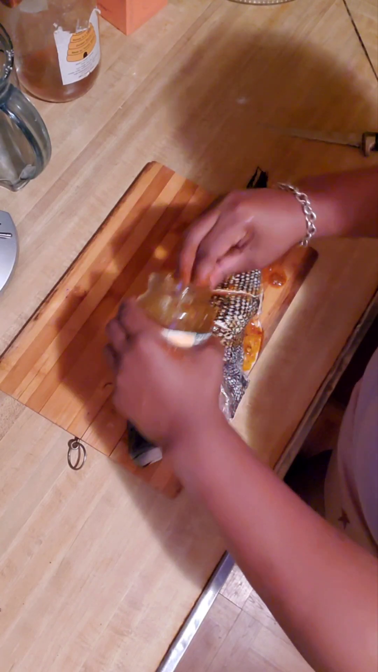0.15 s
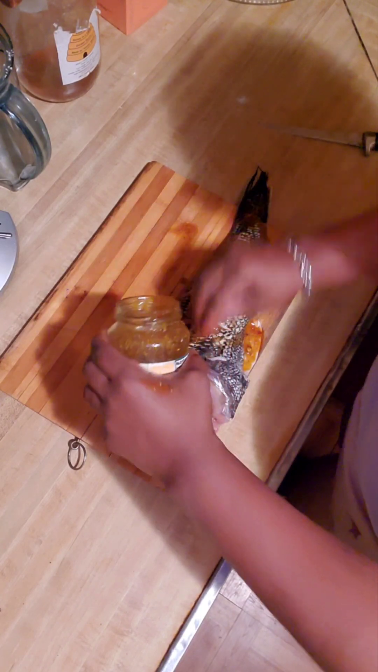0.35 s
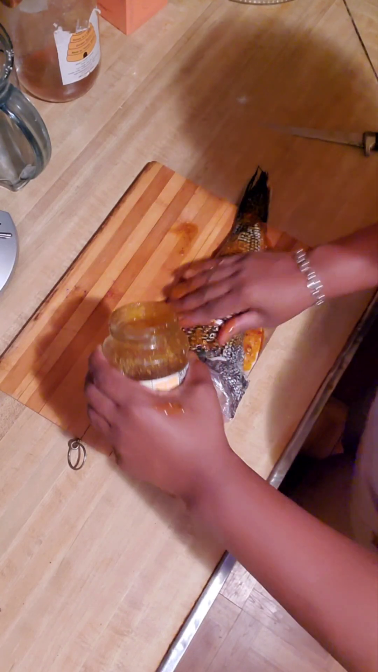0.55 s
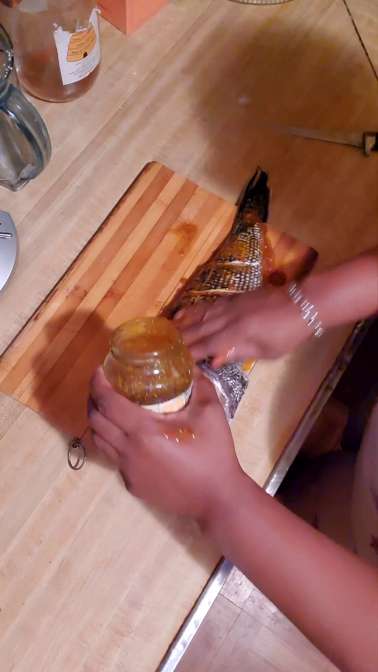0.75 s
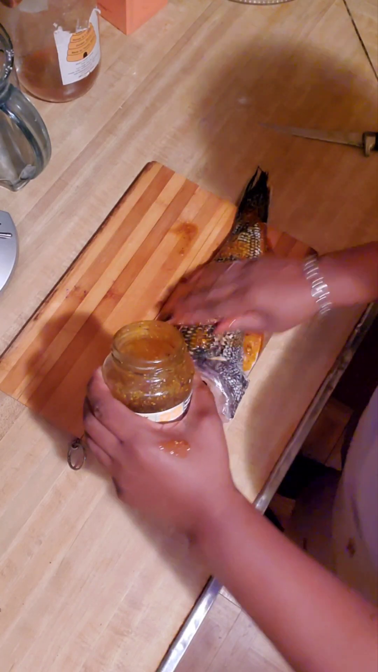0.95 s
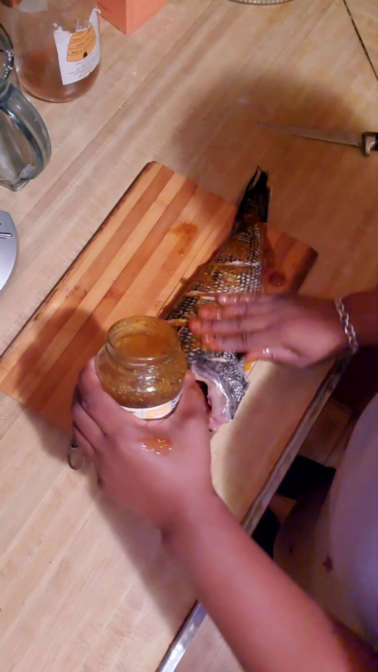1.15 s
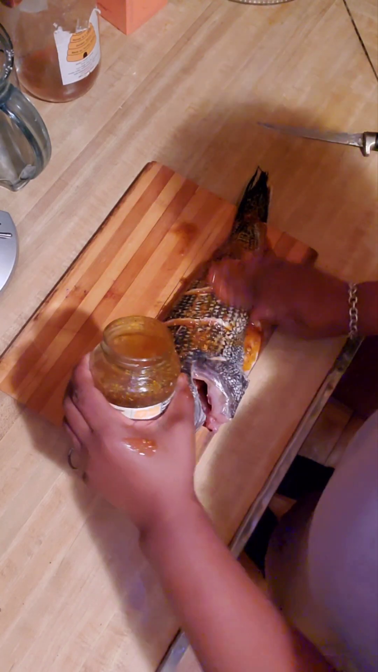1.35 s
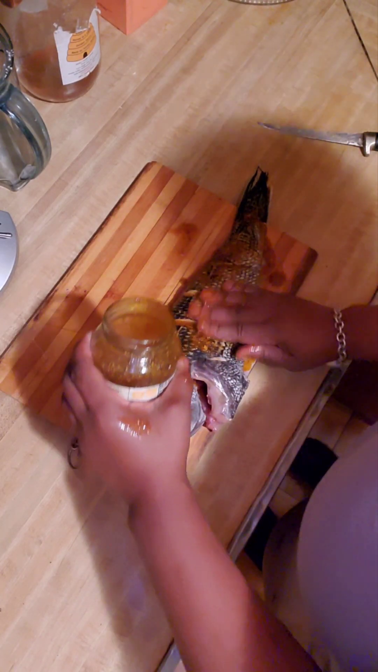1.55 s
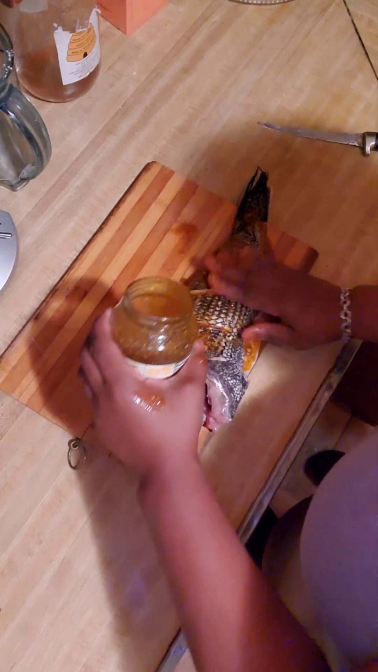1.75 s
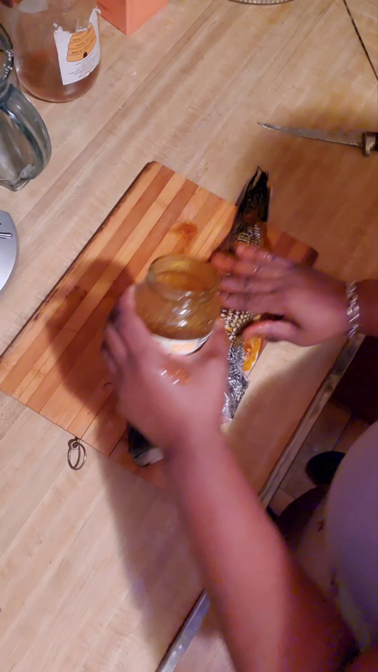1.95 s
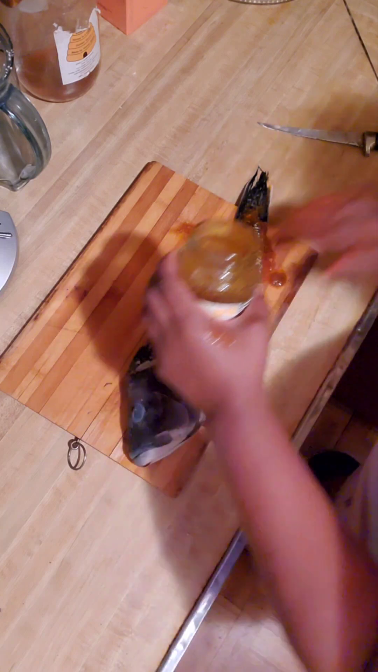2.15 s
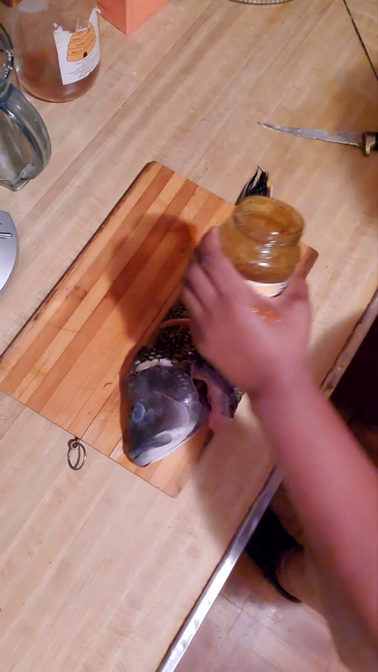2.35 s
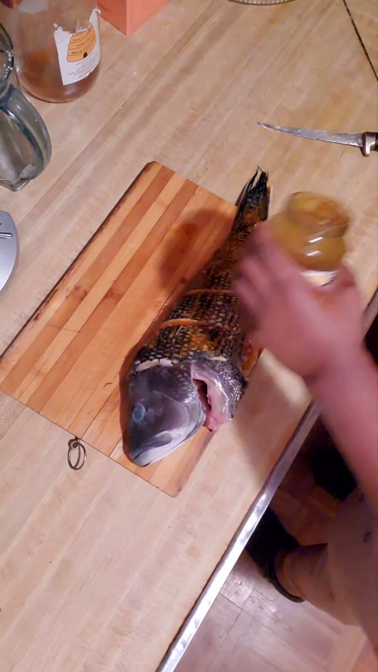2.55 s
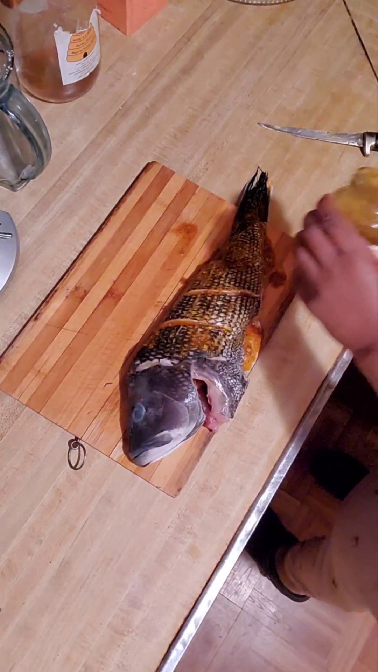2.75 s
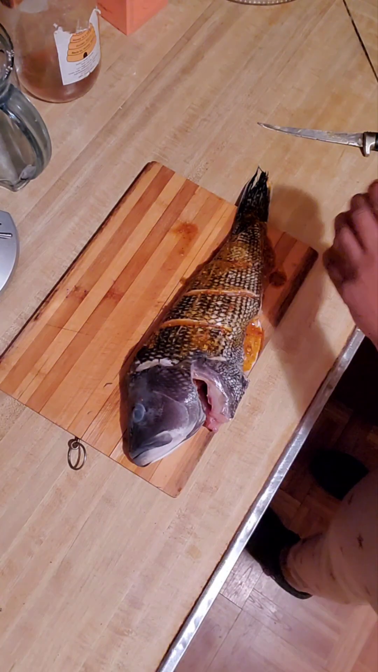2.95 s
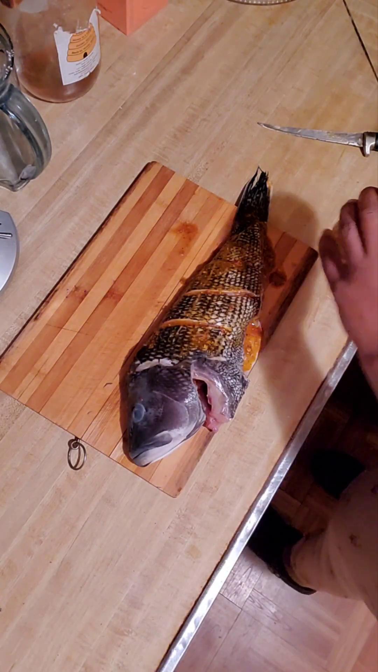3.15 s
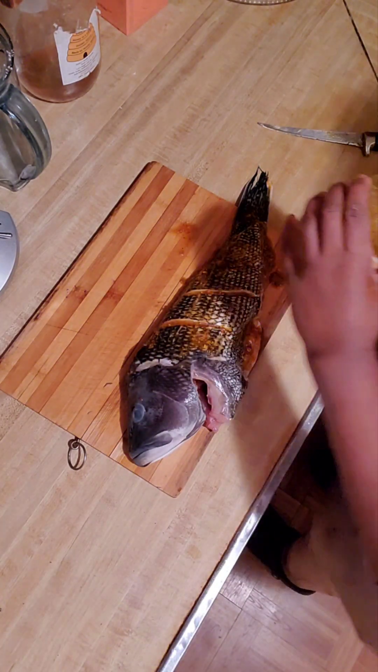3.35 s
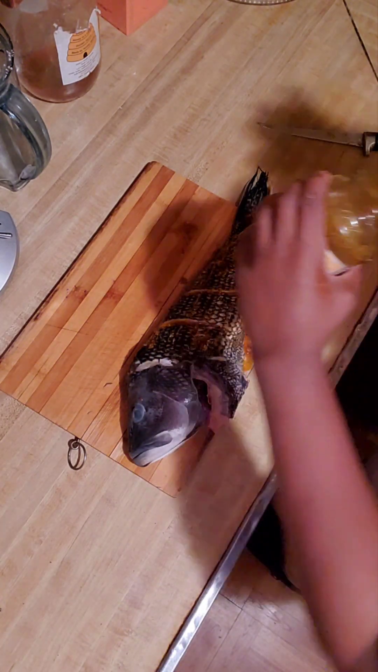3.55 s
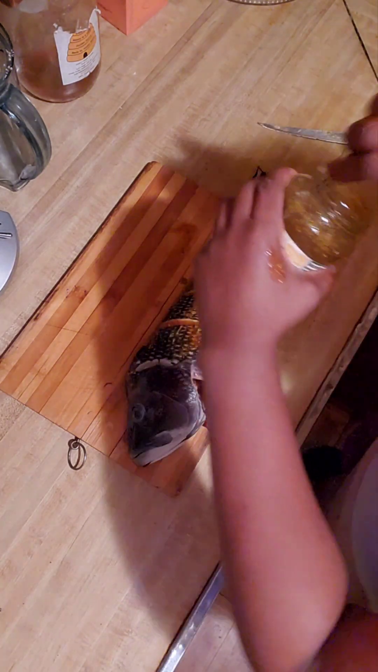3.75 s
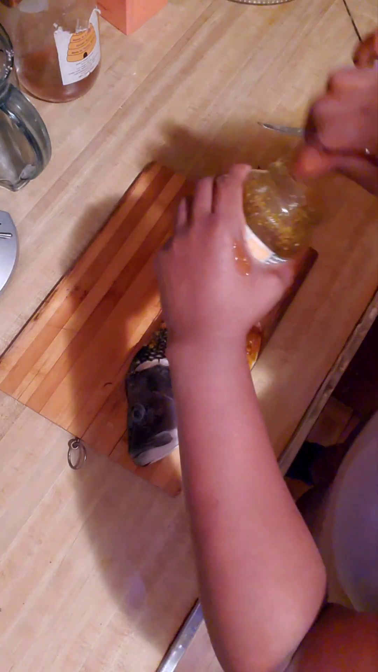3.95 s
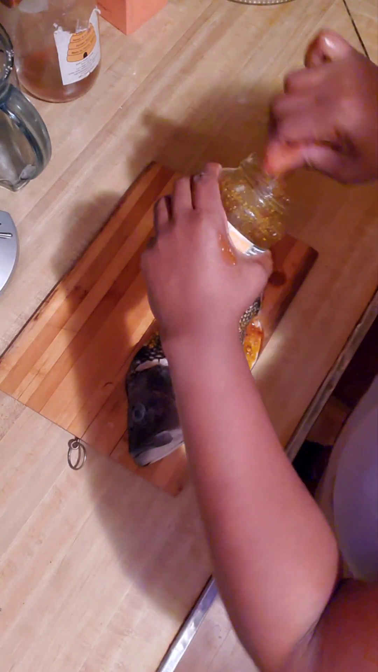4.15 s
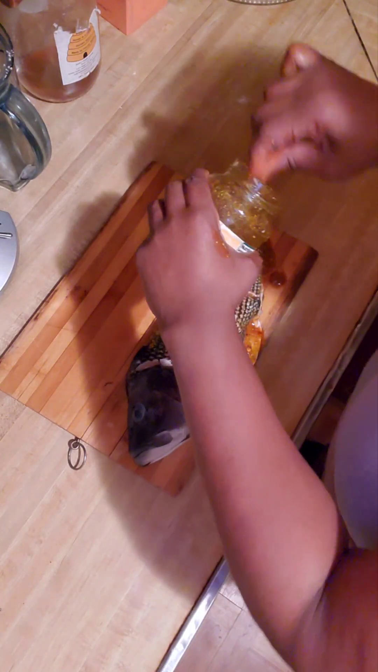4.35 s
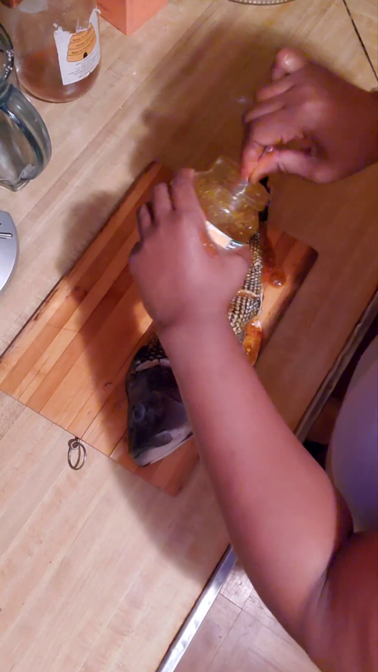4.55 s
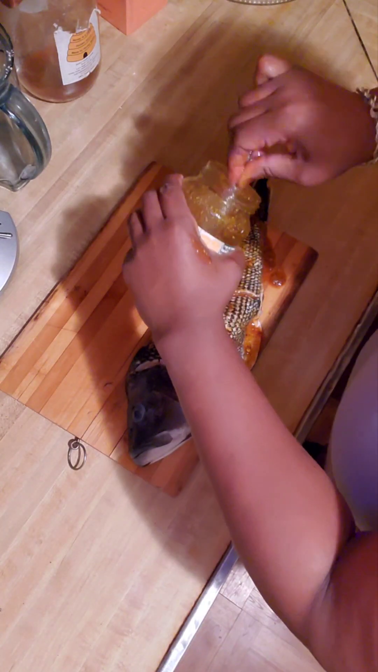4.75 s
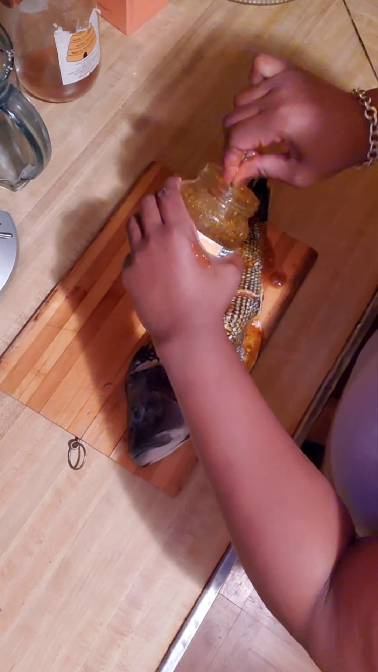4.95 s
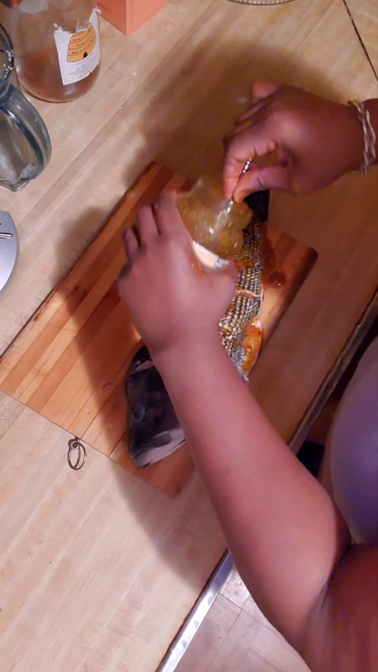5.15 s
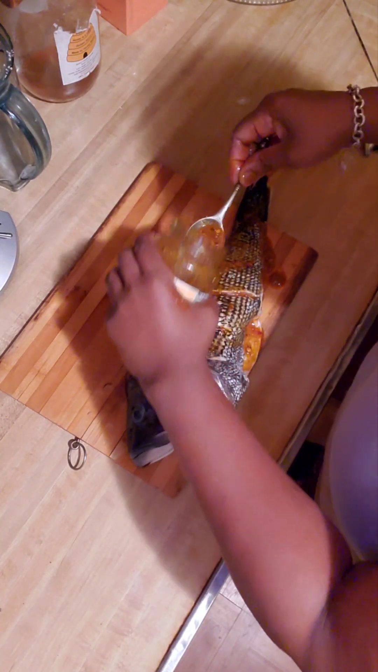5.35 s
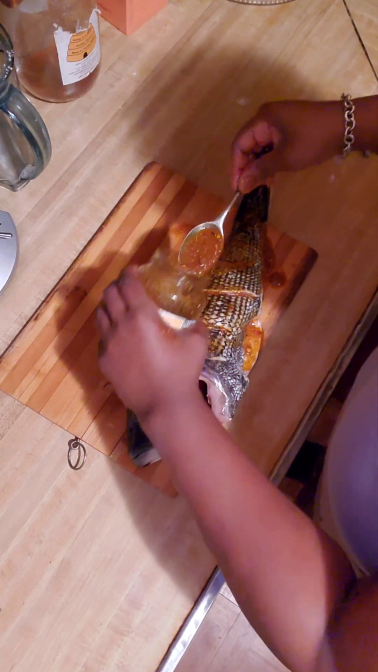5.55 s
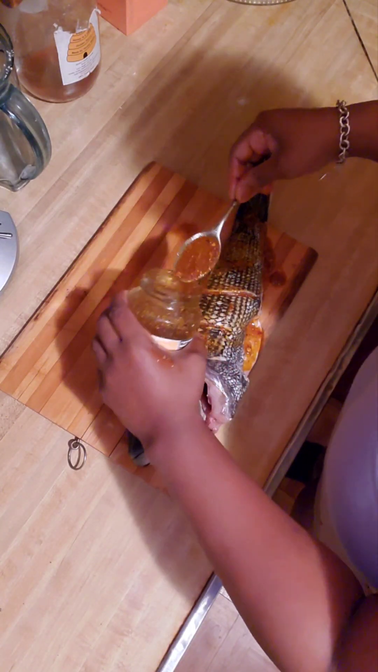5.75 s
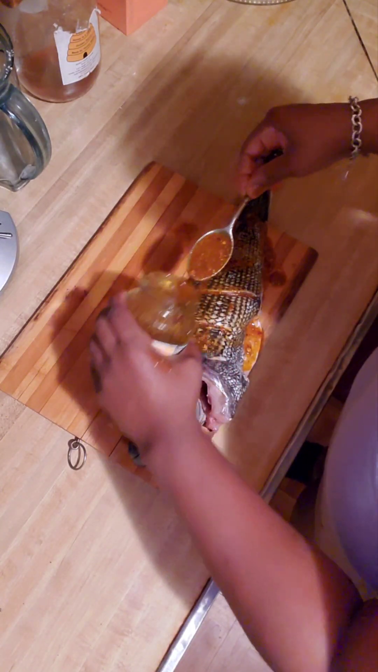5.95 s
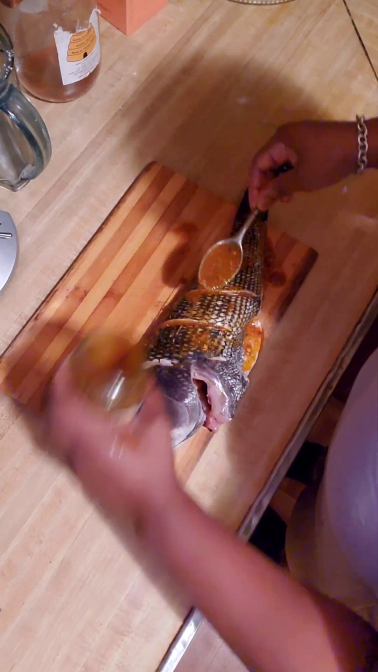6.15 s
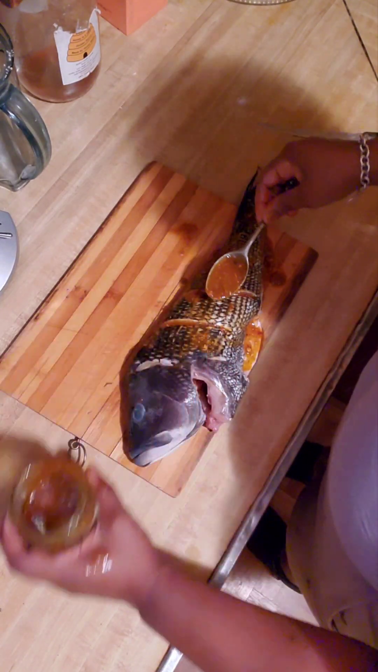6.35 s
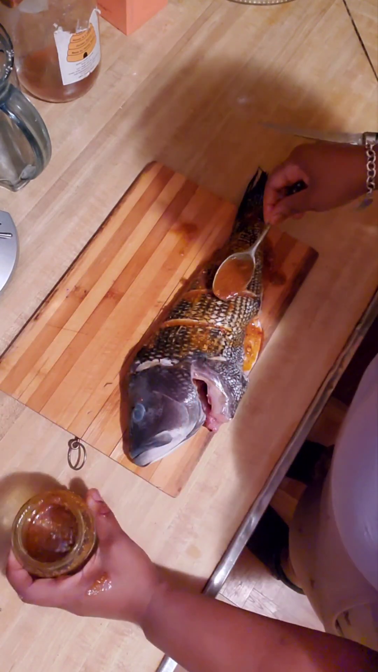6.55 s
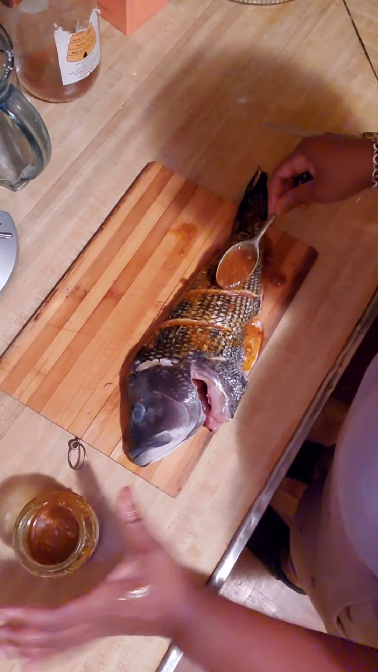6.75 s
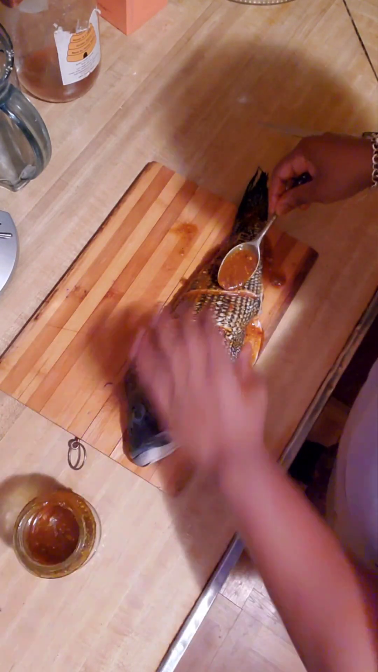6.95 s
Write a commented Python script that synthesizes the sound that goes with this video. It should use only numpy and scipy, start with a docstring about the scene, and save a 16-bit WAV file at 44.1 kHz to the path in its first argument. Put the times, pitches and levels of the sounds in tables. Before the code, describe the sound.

Throughout, a kitchen extractor fan gives a low airy rush with wavering motor hum and boxy resonances. From 0 to 1 s, a hand makes very faint wet pats on a fish; from about 1.0 to 2.1 s these become crisp, sticky smacks with a light slap near 1.4 s and a whispery palm slide, strongest around 1.95 s. Quiet then, apart from a soft smack at 2.9 s and faint cutlery touches. At 3.65 s a spoon clinks brightly into a hand-held glass jar, with a thin metallic ring and hollow boom at 3.84 s. Irregular, sauce-damped clinks and short scrapes continue to 5.35 s, then a lighter draw over the rim until about 5.7 s. Tiny metal ticks follow. At 6.6 s the jar knocks heavily onto the wooden counter, rocks with two weaker taps and settles by 6.75 s, leaving the fan. Close phone microphone, short room echo.

```python
"""Throughout, an extractor fan in a small kitchen makes air rush, wavering hum and housing resonances.
First a hand pats sauce on a fish: band-passed noise bursts for smacks and slaps, random grains for the slide.
Then a spoon clinks and scrapes in a hand-held glass jar: bursts and dense clicks ring the glass, air booms.
Thin metal rings and ticks are scattered around; last, the jar knocks down on a wooden counter.
A phone microphone with two ports adds colour, hiss, gain control and rounded peaks."""
import sys
import numpy as np
from scipy import signal
from scipy.fft import rfft, irfft, next_fast_len
from scipy.io import wavfile
from scipy.ndimage import uniform_filter1d

SR = 44100
rng = np.random.default_rng(int(sys.argv[2]) if len(sys.argv) > 2 else 0)


def generate_wav(signal):
    """Clip the signal to [-1, 1] and save it as 16-bit WAV at the path in sys.argv[1]."""
    frames = np.transpose(np.atleast_2d(signal))
    scaled = np.clip(frames, -1, 1) * 32767
    pcm = np.round(scaled).astype(np.int16)
    wavfile.write(sys.argv[1], SR, pcm)


N = 312669   # samples in the scene
BURST_N = 12000   # samples in one burst


def amp(db):
    """Decibels to gain."""
    return 10 ** (np.asarray(db, float) / 20)


def rms_one(x):
    """Scale to unit rms."""
    return x / np.sqrt(np.mean(x ** 2) + 1e-30)


def at_peak(db, x):
    """Scale to a peak level in dB."""
    return amp(db) * x / np.abs(x).max()


def level(rows):
    """Gain along a (t/s, level/dB) curve, held at -120 dB outside it."""
    s, db = np.transpose(rows)
    return amp(np.interp(np.arange(N) / SR, s, db, left=-120, right=-120))


def wander(points):
    """A random curve, joined by straight lines between evenly spaced points."""
    return np.interp(np.arange(N), np.linspace(0, N, points), rng.standard_normal(points))


def at_hz(points, hz):
    """Read a table on a log-frequency axis."""
    points = np.array(points)
    return np.interp(np.log(hz + 1), np.log(points[:, 0]), points[:, 1])


def coloured(x, spectrum):
    """Give a steady or dense signal a spectrum."""
    size = next_fast_len(N)
    gain = amp(at_hz(spectrum, np.fft.rfftfreq(size, 1 / SR)))
    return irfft(rfft(x, size) * gain)[:N]


def band_pass(x, edges):
    """Keep the band between two edges in Hz."""
    return signal.sosfilt(signal.butter(2, edges, "band", fs=SR, output="sos"), x)


def around(x, modes):
    """Keep only the band that a family of modes spans."""
    hz = [mode[0] for mode in modes]
    return band_pass(x, [0.89 * min(hz), 0.985 * max(hz)])


def clicks(times, sizes):
    """Single-sample impulses."""
    out = np.full(N, 1e-18)
    np.add.at(out, (np.asarray(times) * SR).astype(int), sizes)
    return out


def grains(per_s, spread_db):
    """Random clicks of uneven size and either sign."""
    sizes = amp(spread_db * np.minimum(rng.exponential(1, N), 5)) * rng.choice([-1, 1], N)
    return rms_one(sizes * (rng.random(N) < per_s / SR)) + 1e-12


def burst(rise, length):
    """Noise that swells over its rise, then dies at 60 dB per length (both s), cut at BURST_N."""
    t = np.arange(BURST_N) / SR
    rise = max(rise, 1e-4)
    swell = np.minimum(t / rise, 1)
    decay = amp(-60 * np.maximum(t - rise, 0) / max(length, 1e-4))
    return rng.standard_normal(BURST_N) * swell * decay


def ring(force, hz, t60):
    """A unit click sets a decaying sine of about unit height ringing."""
    r = amp(-60 / (max(t60, .002) * SR))
    w = 2 * np.pi * hz / SR
    return signal.lfilter([0, np.sin(w)], [1, -2 * r * np.cos(w), r * r], force)


def struck(blows, modes):
    """Clean clicks into a table of modes."""
    s, db = np.transpose(blows)
    force = clicks(s, amp(db))
    return sum(amp(mode_db) * ring(force, hz, t60) for hz, mode_db, t60 in modes)


def add(out, s, sound):
    """Mix a sound in at a time."""
    start = int(s * SR)
    out[..., start:start + sound.shape[-1]] += sound[..., :N - start]


# colour of the air rush: [f/Hz, relative level/dB]
AIR_COLOUR = [(13, -60.5), (22, -40.5), (55, 1.5), (76, -1), (94, -14.5), (124, -9.5), (265, -10.5),
              (308, -7), (597, -30), (731, -14), (943, -22.5), (1180, -21), (2070, -44.5), (7560, -42.5),
              (9500, -58), (12400, -95), (20900, -120)]
# resonances of the fan housing: [f/Hz, nominal width/Hz, rms level/dB]
HOUSING_MODES = [(69, 19, -53), (162.3, 16, -60.5), (234.7, 16, -55), (358.2, 45, -56.5),
                 (650.6, 25.6, -53.5), (729, 47, -55.5), (1173, 110, -66.5), (1546, 20, -72.5),
                 (1925, 22, -82), (3670, 330, -83), (4830, 37, -82)]
AIR_DB, HUM_HZ, HUM_DB = -50.5, 64, -51   # rms levels


def fan():
    """Air rush, motor hum that wavers in pitch, and noise ringing in the housing."""
    out = amp(AIR_DB) * rms_one(coloured(rng.standard_normal(N), AIR_COLOUR))
    hum_hz = HUM_HZ * (1 + 0.039 * wander(points=40))
    out += amp(HUM_DB) * np.sqrt(2) * np.sin(np.cumsum(2 * np.pi * hum_hz / SR))
    for hz, width, db in HOUSING_MODES:
        out += amp(db) * rms_one(ring(rng.standard_normal(N), hz, 2.83 / width))
    return out


# reverberation of the kitchen: [f/Hz, t60/s]
ROOM_DECAY = [(100, 0.13), (500, 0.28), (2000, 0.21), (6000, 0.26), (15000, 0.16)]


def tail(count):
    """Diffuse echoes: noise whose octave bands die at their own rates."""
    t, out = np.arange(count) / SR, 0
    for hz in 90 * 2 ** np.arange(8):
        band = band_pass(rng.standard_normal(count), [hz / np.sqrt(2), hz * np.sqrt(2)])
        out = out + band * amp(-60 * t / at_hz(ROOM_DECAY, hz))
    return out * np.clip(t / 0.0043, 0, 1) / np.sqrt(np.sum(out ** 2))


# cutlery touches cutlery: [t/s, click level/dB]
CUTLERY_TOUCHES = [(1.775, -66), (1.81, -55), (1.93, -80), (3.311, -55), (3.34, -53.5), (3.435, -66),
                   (3.816, -36)]
# cutlery modes: [f/Hz, relative level/dB, t60/s]
CUTLERY_MODES = [(7910, 0, 0.36), (14370, 4.5, .12)]
# the loosely held spoon rings on at the rim: [t/s, click level/dB]
RIM_TOUCHES = [(3.648, -36.5)]
# spoon modes: [f/Hz, relative level/dB, t60/s]
SPOON_MODES = [(8950, 2, 0.32), (10680, -3.5, 0.249), (15600, -10, 0.086)]
# faint small metal ticks: [t/s, peak level/dB, f/Hz]
METAL_TICKS = [(5.8721, -50, 7000), (6.0811, -56.5, 7270), (6.5344, -65.5, 6750), (6.7406, -49, 5860),
               (6.754, -46, 5690)]


def metal():
    """Clicks ring thin high modes of cutlery and spoon; noise bursts make short rough ticks."""
    out = struck(CUTLERY_TOUCHES, CUTLERY_MODES) + struck(RIM_TOUCHES, SPOON_MODES)
    for s, db, hz in METAL_TICKS:
        add(out, s, at_peak(db, ring(burst(0.0018, 0.079), hz, t60=0.021)))
    return out


# palm sliding: [t/s, rms level/dB]
SLIDE_LEVEL = [(0.0, -100), (0.56, -77), (1.04, -65), (1.19, -74), (1.42, -78), (1.46, -51), (1.59, -59.5),
               (2.11, -69), (2.64, -77), (3.31, -82), (3.6, -71)]
# colour of the slide: [f/Hz, relative level/dB]
SLIDE_COLOUR = [(1180, -42), (2000, -12.5), (3310, -3), (4570, -24), (6200, -1.5), (8260, -1),
                (9410, -18.5), (14000, -12.5), (16000, -15)]


def slide():
    """The palm slides as a dense stream of coloured grains."""
    return level(SLIDE_LEVEL) * rms_one(coloured(grains(3800, spread_db=4.5), SLIDE_COLOUR))


FAINT_SPAN_S, FAINT_DB, FAINT_SPREAD_DB = (.02, 2.9), -62, 4
FAINT_HZ, FAINT_OCTAVES, FAINT_S = (3500, 6900), .4, .05


def faint_pats(count):
    """Faint smacks by chance while the hand works, as rows like those of SMACKS."""
    rows = []
    for when, size, pitch in rng.random((count, 3)):
        s = np.interp(when, [0, 1], FAINT_SPAN_S)
        db = FAINT_DB + FAINT_SPREAD_DB * (2 * size - 1)
        rows.append((s, db, FAINT_HZ[int(pitch > .5)], FAINT_OCTAVES, FAINT_S))
    return rows


# palm on wet scales: [t/s, peak level/dB, centre f/Hz, width/octaves, length/s]
SMACKS = [(0.045, -60, 3400, 0.18, 0.027), (.142, -62, 3450, 0.26, .05), (0.24, -52.5, 3760, 0.99, 0.098),
          (0.617, -56.5, 3600, 0.45, 0.12), (0.683, -52.5, 4970, 1.2, 0.13), (.843, -44.5, 6100, 0.88, 0.5),
          (0.996, -35.5, 6720, 0.3, 0.073), (1.031, -48, 8000, 1.5, 0.11), (1.164, -52.5, 3650, 0.17, .04),
          (1.194, -54, 6740, .5, 0.057), (1.372, -46, 7100, 1.6, 0.27), (1.405, -32.5, 5900, 0.74, 0.048),
          (1.498, -32, 3260, 1.37, 0.32), (1.592, -37.5, 5850, 0.33, 0.031),
          (1.619, -38.5, 6170, 0.24, 0.033), (1.689, -36.5, 5800, .21, .03),
          (1.705, -31.5, 6160, 0.52, 0.049), (1.731, -45, 4170, .13, .06), (1.786, -36, 8200, 1.1, 0.017),
          (1.837, -44.5, 3960, 0.57, 0.19), (1.859, -38.5, 7250, 0.41, 0.077),
          (1.941, -27, 9000, 1.6, 0.033), (1.95, -23.5, 6170, 1.05, 0.13),
          (2.103, -34.5, 13900, 0.52, 0.069), (2.104, -41, 5800, 1, 0.039),
          (2.908, -48.5, 4500, 1.14, 0.18), (3.312, -41.5, 10900, 1.56, 0.16)]
SMACK_RISE_SHARE = 0.051   # of the length


def smacks():
    """Each wet smack is a noise burst in its own band."""
    out = np.zeros(N)
    for s, db, hz, octaves, length in list(SMACKS) + faint_pats(count=14):
        edges = hz * 2 ** (np.array([-.5, .5]) * max(octaves, .1))
        edges = np.minimum(edges, [19000, 20000])
        add(out, s, at_peak(db, band_pass(burst(SMACK_RISE_SHARE * length, length), edges)))
    return out


# palm slapping the fish on its board: [t/s, relative level/dB]
SLAPS = [(1.429, -23), (1.448, -31)]
# colour of fish and board: [f/Hz, relative level/dB]
SLAP_COLOUR = [(240, -53), (400, -10), (1140, 15.5), (1630, -2), (1840, 1), (2710, -1), (3810, 8),
               (6950, -4.5), (9610, -10.5), (16000, -18)]


def slaps():
    """Sudden noise bursts take the colour of fish and board."""
    out = np.zeros(N)
    for s, db in SLAPS:
        add(out, s, amp(db) * burst(0.00056, 0.089))
    return amp(3.0) * coloured(out, SLAP_COLOUR)


# jar base meets the counter, rocks and settles: [t/s, relative level/dB, hardness as low-pass f/Hz]
JAR_KNOCKS = [(6.608, 0, 1520), (6.667, -14, 2480), (6.714, -22.5, 1500)]
# clear modes of the wood: [f/Hz, relative level/dB, t60/s]
WOOD_MODES = [(97, -7.5, 0.047), (191, -3.5, 0.079), (280, -10.5, 0.08), (336, 1, 0.065), (411, 9, 0.053),
              (487, 14.5, 0.011), (654, 3.5, 0.05), (801, -7.5, 0.11), (934, 1, 0.033), (1208, 0, 0.039),
              (1470, -41, 0.073), (1850, -15, 0.032), (2955, -15, 0.056), (3520, -4.5, 0.036),
              (6030, 2, 0.0059), (7880, -0.5, 0.019)]
# dense ringing of the whole counter: [f/Hz, relative level/dB]
THUD_COLOUR = [(35, -56), (60, -1.5), (149, -16.5), (184, -6), (287, -1), (417, -2.5), (540, -13.5),
               (822, -5), (1470, -27), (3580, -31.5), (4320, -39), (16000, -55)]


def counter():
    """A soft contact is a low-passed click into the wood's clear modes, over a dense noisy ring."""
    force, rattle, modes = np.zeros(N), np.zeros(N), np.zeros(N)
    for s, db, hardness_hz in JAR_KNOCKS:
        force += signal.lfilter(*signal.butter(1, hardness_hz, fs=SR), clicks([s], -amp(db)))
        add(rattle, s, amp(db) * burst(0.0044, .17))
    for k, (hz, db, t60) in enumerate(WOOD_MODES):
        modes += (-1) ** k * amp(db - 10.5) * ring(force, hz, t60)   # neighbours alternate in sign
    return modes + amp(9.5) * coloured(rattle, THUD_COLOUR)


# air in the jar booms: [t/s, peak level/dB, f/Hz]
AIR_BOOMS = [(3.649, -29.5, 628), (3.842, -16.5, 619), (4.159, -30, 633), (4.306, -33.5, 594),
             (4.649, -40, 652), (4.81, -30, 627), (4.983, -26.5, 605), (5.135, -31, 575),
             (5.319, -32.5, 581)]


def jar_air():
    """A soft push of under a millisecond sets the air in the jar booming."""
    out = np.zeros(N)
    push = np.pad(np.hanning(40), (0, 12000))
    for s, db, hz in AIR_BOOMS:
        add(out, s, at_peak(db, ring(push, hz, t60=0.11)))
    return out


# the spoon is drawn out over the rim: [t/s, level/dB]
RIM_DRAW = [(5.41, -66), (5.44, -41.5), (5.52, -49.5), (5.58, -45), (5.65, -57), (5.78, -89)]
DRAG_START_DB, DRAG_FADE_DB_PER_S, DRAG_RISE_S = -35, 80.5, .02
DRAG_FOLLOWS, DRAG_GLANCING = 0.42, 0.13   # dB of drag per dB of blow and of glancing
DRAG_STUTTER_DB = 2.5


def dragging():
    """Scrape gain: swells and fades after blows before the draw-out, then that; stick and slip stutter it."""
    t, gain = np.arange(N) / SR, level(RIM_DRAW)
    for s, db, glancing_db, *_ in CLINK_BLOWS:
        if s >= RIM_DRAW[0][0]:
            continue
        since = np.maximum(t - s, 0)
        start_db = DRAG_START_DB + DRAG_FOLLOWS * db + DRAG_GLANCING * glancing_db
        swell = np.minimum(since / DRAG_RISE_S, 1)
        gain = np.maximum(gain, swell * amp(start_db - DRAG_FADE_DB_PER_S * since))
    return gain * amp(DRAG_STUTTER_DB * wander(points=500))


# how strongly dragging feeds each family of glass modes: [level/dB]
DRAG_FEED = [-12.5, -8.5, -2, -12, -5, -11, -12.5]
DRAG_PER_S, DRAG_DAMPING = 4500, 0.14   # clicks per s; the pressed spoon shortens the ring by this factor


def scrape():
    """The dragging spoon feeds the glass modes with dense clicks."""
    out, gain = np.zeros(N), dragging()
    for feed_db, modes in zip(DRAG_FEED, GLASS_MODES):
        drag = grains(DRAG_PER_S, spread_db=2.5)
        rung = sum(amp(mode_db) * ring(drag, hz, DRAG_DAMPING * t60) for hz, mode_db, t60 in modes)
        out += gain * amp(feed_db) * rms_one(around(rung, modes))
    return out


# spoon on glass: [t/s, blow level/dB, glancing level/dB, second bending level/dB, ring-time factor]
CLINK_BLOWS = [(3.647, -8.5, -26.5, -7.5, 0.67), (3.837, -12, 2, -2.5, 0.35), (4.087, -42, -4, -4.5, 0.44),
               (4.102, -15.5, -7.5, -8, 0.29), (4.149, -44, -2, 0.5, .4), (4.308, -4, -14, -7.5, 0.35),
               (4.443, -15, -6, 1, 0.58), (4.591, -20, -4.5, -13.5, 0.55), (4.774, -8.5, -8, -5, 0.67),
               (4.974, -15.5, -3, -12, 0.87), (5.132, -8.5, -1.5, -4.5, 0.44),
               (5.317, -7.5, -29, -16, 0.54), (5.349, -46, -31, -20, .8), (5.446, -31, -23, -13, 0.56),
               (5.474, -29.5, -15, -10, 0.75), (5.6, -31.5, -26, -8, .5), (5.635, -41.5, -15, -6, 0.52),
               (5.958, -42.5, -6, -3.5, .67)]
# glass modes in families: dull crack through the sauce, base, lowest wall bending, then higher ones;
# each family lists [nominal f/Hz, relative level/dB, nominal t60/s]
GLASS_MODES = [
    [(524, -15, 0.0035), (1253, 6.5, 0.017), (1972, 0.5, 0.0097), (2240, 12.5, 0.014)],
    [(3032, -9, 0.122), (3242, -1.5, 0.051)],
    [(3490, -19, 0.055), (3700, -8, 0.09), (3655, 3.5, 0.046), (3772, -6.5, 0.033), (4016, -25.5, 0.013)],
    [(5230, -16.5, 0.053), (5390, -10, 0.036), (5426, 4, 0.022), (5490, -13, 0.021)],
    [(6100, -2.5, 0.013), (6240, -9, .03), (6440, -2, 0.069), (6854, 5.5, 0.065), (7136, -8, 0.075)],
    [(7540, -6.5, .02), (8100, -5, 0.0242), (8190, -8, 0.0191), (8430, 3.5, 0.013)],
    [(10100, -4, 0.0099), (11640, 1.5, 0.0027), (13800, -7, .006), (14100, -10, .006), (15300, -3, 0.0055)],
]
# answer of each family to a blow: [level/dB, share of glancing level, share of second bending level]
FAMILY_ANSWER = [(-6, 0.32, 0), (-4, 0.66, 0.5), (6, 0, 0), (8, 1, 0.5), (6.5, 0, 1), (5, 0.8, 0.5),
                 (-2.5, .5, 0.5)]
CONTACT_RISE_S, CONTACT_S = 0.00159, 0.017
DETUNE, MODE_SPREAD_DB = 0.0095, 3   # random spread of each mode: share of pitch, level
JAR_PAN_DB = -0.25   # left minus right


def clinks():
    """Each blow is a brief chattering contact; grip and sauce detune and damp the modes anew."""
    out = np.zeros((2, N))
    for s, db, glancing_db, second_db, ring_time in CLINK_BLOWS:
        blow = 0
        for (family_db, glancing, second), modes in zip(FAMILY_ANSWER, GLASS_MODES):
            force, rung = burst(CONTACT_RISE_S, CONTACT_S), 0
            for hz, mode_db, t60 in modes:
                spread, detune = rng.standard_normal(2)
                mode = ring(force, hz * (1 + DETUNE * detune), t60 * ring_time)
                rung = rung + at_peak(mode_db + MODE_SPREAD_DB * spread, mode)
            answer_db = db + family_db + glancing * glancing_db + second * second_db
            blow = blow + at_peak(answer_db, around(rung, modes))
        add(out, s, blow * amp([[JAR_PAN_DB / 2], [-JAR_PAN_DB / 2]]))
    return out


# colour of the difference between the two ports: [f/Hz, relative level/dB]
SIDE_COLOUR = [(60, -36.5), (110, -29), (200, -39), (380, -32.5), (700, -38), (1290, -33), (2380, -43.5),
               (4400, -22), (8120, -8), (12000, -3.5), (15000, -13)]


def scene():
    """Near sources with their echoes over the fan; the two microphone ports hear almost the same."""
    hand = slide() + smacks() + slaps()
    near = clinks() + scrape() + jar_air() + hand + metal() + counter()
    mid = near.mean(axis=0)
    echo, side_echo = (signal.fftconvolve(mid, tail(count=22000))[:N] for _ in range(2))
    side = coloured(amp(-11.0) * side_echo + amp(-4.0) * fan(), SIDE_COLOUR)
    return near + amp(-6.5) * echo + fan() + side * [[1], [-1]]


# microphone response: [f/Hz, level/dB]
MIC_COLOUR = [(20, -8.5), (45, 0), (8400, -0.5), (9600, -8), (11000, -1.5), (16000, 2.5)]
# balance of the two ports: [f/Hz, left minus right level/dB]
PORT_BALANCE = [(1500, 0), (3500, -1.24), (8000, 2), (15000, -0.8)]
HISS_DB, CUTOFF_HZ = -88, 16800   # hiss is rms, ahead of the gain control


def record(dry):
    """Microphone colour and hiss; gain control ducks after loud blows, recovers slowly; peaks round, top cut."""
    ports = []
    for port, lean in zip(dry, [.5, -.5]):
        balance = np.array(PORT_BALANCE) * np.array([1, lean])
        ports.append(coloured(coloured(port, MIC_COLOUR), balance))
    heard = np.array(ports) + amp(HISS_DB) * rng.standard_normal(N)   # both ports share the hiss
    db = 10 * np.log10(uniform_filter1d(heard.mean(axis=0) ** 2, size=441) + 1e-12)
    fall = 12 * np.arange(N) / SR   # release in dB per s
    held = np.maximum.accumulate(db + fall) - fall
    over_db = np.maximum(held + 40, 0)
    ducking_db = -.12 * signal.lfilter([.0005], [1, .0005 - 1], over_db)
    rounded = 1.475 * np.tanh(amp(ducking_db) * heard / 1.347)
    return signal.sosfilt(signal.cheby2(18, 95, CUTOFF_HZ, fs=SR, output="sos"), rounded)


dry = scene()
out = record(dry)
generate_wav(out)
```